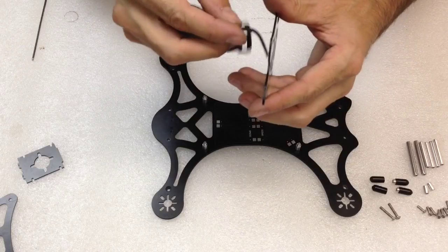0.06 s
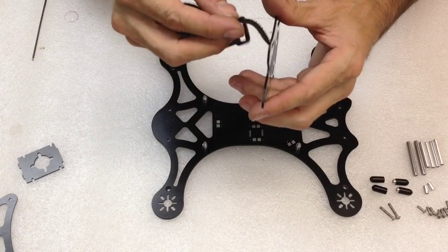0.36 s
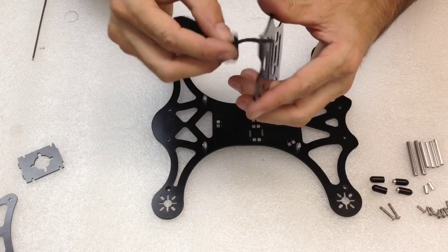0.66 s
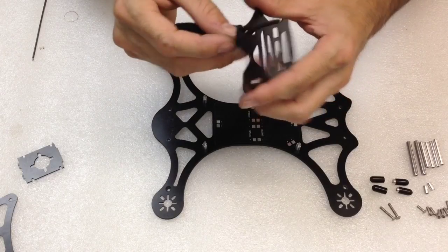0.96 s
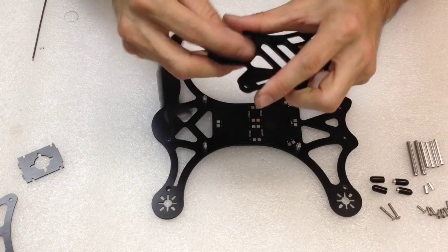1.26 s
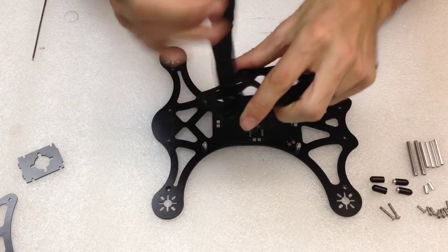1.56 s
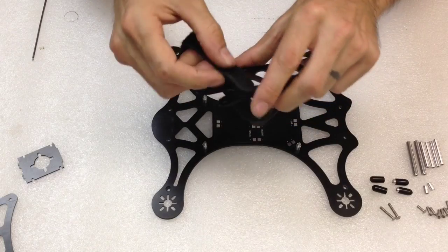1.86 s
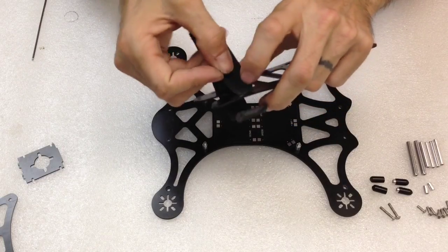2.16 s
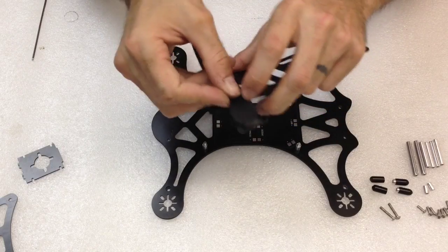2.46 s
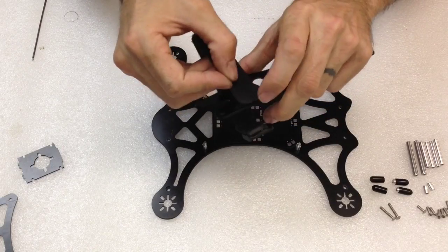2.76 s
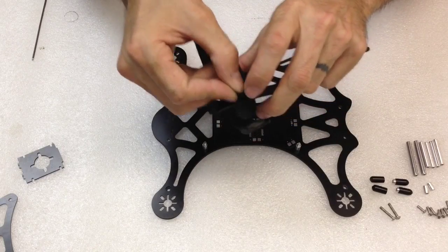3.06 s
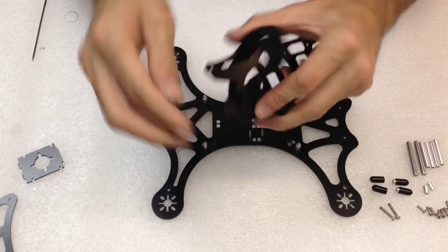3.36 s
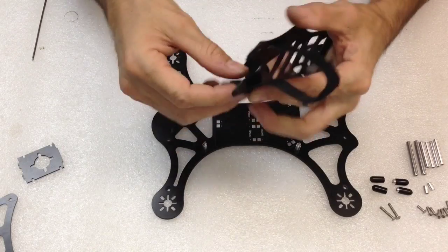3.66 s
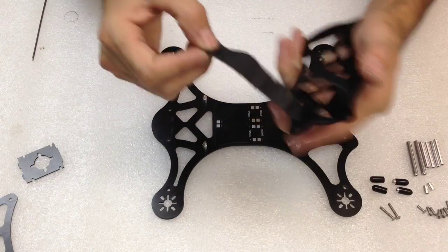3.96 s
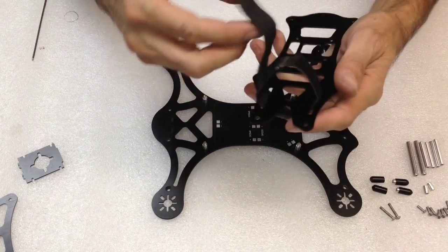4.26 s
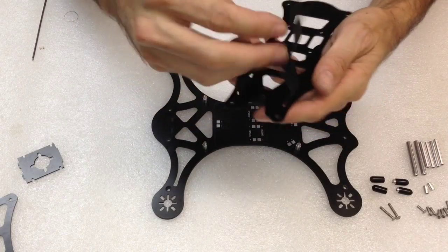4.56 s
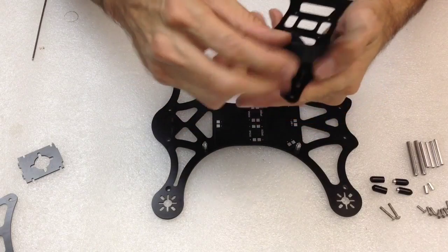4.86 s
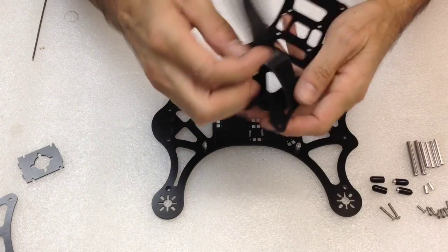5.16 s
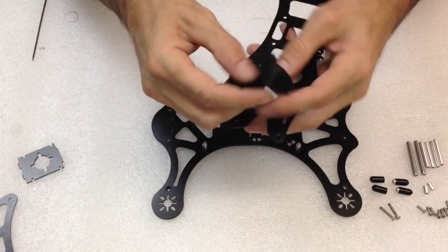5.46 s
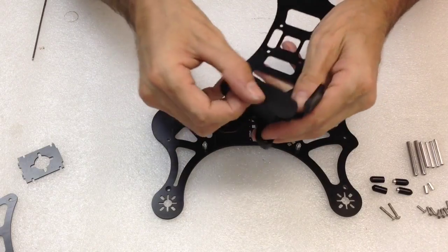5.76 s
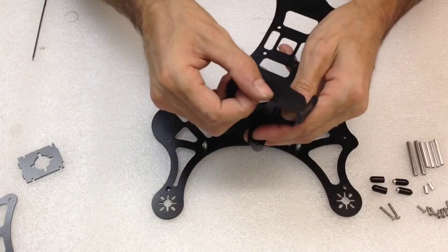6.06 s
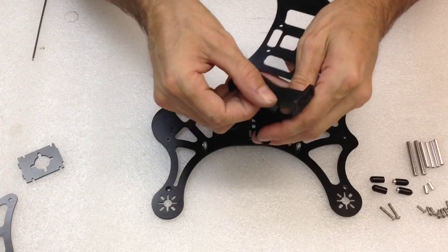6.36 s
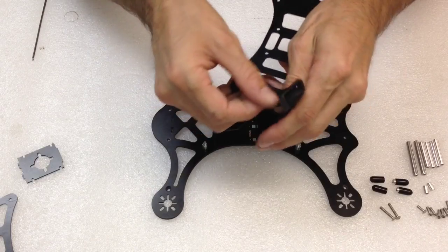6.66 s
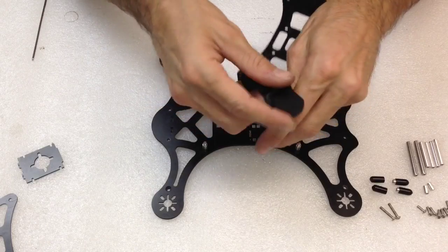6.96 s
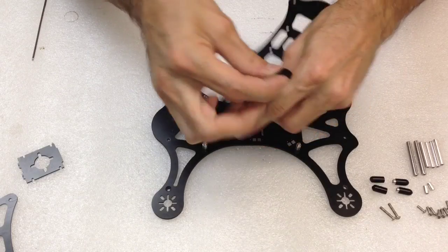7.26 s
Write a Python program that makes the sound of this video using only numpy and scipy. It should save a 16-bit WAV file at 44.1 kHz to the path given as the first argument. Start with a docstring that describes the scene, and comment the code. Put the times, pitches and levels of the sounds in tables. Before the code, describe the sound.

In a small room with a faint fan and low hum, a fabric strap is worked through a slotted plate over a workbench. Soft, close scraping and rustling comes and goes, dotted with small sharp clicks. The strap rasps through a slot early on, again around the middle, and more lightly at the finish, each pull briefly ringing the hand-held plate.

```python
"""Threading a strap through a plate

Hands feed a woven strap through the slots of a thin, stiff plate, close up over a workbench.
The fabric rustles, fibres snag and tick on the slot edges, and fingertips swish over the weave.
In three quick pulls the strap rasps through and rings the plate.
Underneath lies a small room with mains hum and a running fan."""
import sys
import numpy as np
from scipy import signal
from scipy.fft import rfft, irfft, next_fast_len
from scipy.io import wavfile
from scipy.ndimage import uniform_filter1d, map_coordinates

SR = 44100
rng = np.random.default_rng(int(sys.argv[2]) if len(sys.argv) > 2 else 0)


def transcribe(u):
    """Save the signal u as a 16-bit wav file named by the first command-line argument.

    u: samples, shape (n,) or (channels, n), limited to [-1, 1]; the rate is SR.
    q: integer samples, one column per channel.
    """
    v = np.clip(np.atleast_2d(u).T, -1, 1)
    q = np.round(v * 32767).astype(np.int16)
    wavfile.write(sys.argv[1], SR, q)


N = 327354

# Levels in the tables are relative: each layer is trimmed in the mix.
# spectrum of the fan's rumble and hiss: f/Hz, level/dB
FAN_SPECTRUM = [(20, -25), (35, -17.5), (52, -3), (75, -2.5), (115, -0.5), (165, -4.5), (280, -17.5),
                (400, -19), (620, -27), (1100, -30), (2000, -34), (2350, -29.5), (2800, -33), (3750, -28.5),
                (4500, -36.5), (7000, -44), (15300, -49)]
# mains hum and fan tones: f/Hz, level/dB
HUM_TONES = [(59.2, -58), (120, -70), (242, -78), (737.5, -90), (823.6, -76.5)]
# strap resting against the moving fingers: t/s, level/dB
RESTING_CONTACT = [(0, -84.5), (0.6, -70.5), (1.3, -68), (2.6, -67.5), (2.85, -70.5), (3.5, -73.5),
                   (4.2, -63.5), (4.48, -75.5), (4.7, -65.5), (5.85, -66.5), (6.1, -74.5), (7.42, -69.5)]
# finger strokes feeding the strap along: t/s, length/s, level/dB, hollow re stroke/dB
FEED_STROKES = [(0.663, .06, -63, -14), (0.923, 0.051, -48, -19.5), (1.088, 0.069, -59, -22),
                (1.3, 0.07, -59, -23), (1.433, .1, -63.5, -22), (1.654, 0.053, -58, -25),
                (1.765, .13, -75, -18), (2.15, 0.28, -64.5, -11), (2.382, 0.07, -57, -9),
                (2.457, 0.16, -60, -6), (2.622, 0.082, -55, -13.5), (3.02, 0.047, -48.5, -18),
                (3.135, 0.073, -45, -26), (3.212, 0.055, -50, -25), (3.26, 0.047, -45, -16.5),
                (3.634, 0.039, -55.5, -21), (3.794, 0.088, -59.5, -30), (4.112, 0.16, -63, -27),
                (4.196, 0.034, -58, -23), (4.599, .06, -52.5, -20), (4.683, 0.24, -63, -26),
                (4.916, 0.1, -56, -17), (5.133, 0.18, -54.5, -14), (5.375, 0.16, -61, -18),
                (5.56, 0.046, -51.5, -15), (5.624, 0.074, -59.5, -15), (5.745, 0.093, -62.5, -17),
                (6.327, 0.23, -68.5, -22), (6.696, 0.15, -54, -17), (6.863, .11, -48, -14.5),
                (6.998, 0.18, -60, -20), (7.116, 0.18, -54.5, -23)]
# spectrum of loosely sliding fabric: f/Hz, level/dB
RUSTLE_SPECTRUM = [(200, -25.5), (800, -9), (1500, -6.5), (2900, -6.5), (3700, -0.5), (4600, -5),
                   (6000, -3), (7500, -2), (9500, -4), (12000, -5.5), (15300, -9)]
# hollow of the cupped hands, before grip and damping: f/Hz, width/Hz, level/dB
HAND_MODES = [(340, 144, -6.5), (800, 160, 1.5), (1020, 410, -6)]
# fibres snagging and letting go: t/s, level/dB, f/Hz, t60/s, plate/dB
SNAGS = [(0.373, -50.5, 1780, 0.0089, -44.5), (0.5533, -53.5, 8650, 0.016, -56.5),
         (0.685, -33.5, 6000, 0.052, -46), (0.904, -39.5, 9300, 0.011, -51),
         (0.93, -32.5, 14700, 0.025, -55), (0.989, -39.5, 7200, 0.019, -48),
         (1.0631, -37.5, 9100, 0.0082, -67), (1.0874, -32.5, 9000, 0.029, -52),
         (1.0933, -29.5, 8700, 0.022, -62), (1.201, -37, 12100, .006, -64), (1.2642, -40, 6140, 0.012, -67),
         (1.27, -36.5, 13300, 0.047, -64), (1.306, -48, 5900, 0.006, -50.5),
         (1.434, -43, 8800, 0.0045, -73.5), (1.4727, -39.5, 10200, 0.0031, -62),
         (1.5, -38.5, 7700, 0.0054, -65), (1.5057, -40.5, 6200, 0.024, -50.5),
         (1.671, -25, 10500, 0.0074, -58), (1.7967, -45, 5600, .005, -64), (1.863, -50.5, 5900, .005, -71),
         (1.898, -51, 5800, 0.0069, -73), (2.4292, -54, 6760, 0.0049, -49),
         (2.4862, -41, 6550, 0.0046, -55), (2.5398, -42.5, 6400, 0.0035, -61),
         (2.5655, -37, 9400, 0.023, -60), (2.6297, -40.5, 7740, .018, -51),
         (2.8823, -37.5, 9500, 0.027, -46), (3.023, -42, 2230, 0.0089, -49), (3.032, -41, 7200, .017, -50),
         (3.203, -35.5, 7700, 0.0087, -70), (3.344, -43.5, 3970, .012, -63), (3.4593, -54, 6700, .006, -69),
         (3.7725, -37.5, 6240, 0.011, -63), (3.78, -37, 6300, .014, -56.5),
         (3.7861, -31, 13600, 0.013, -50), (3.874, -41.5, 6200, .017, -65), (3.912, -32, 9900, 0.0046, -64),
         (3.9218, -32, 6400, 0.003, -75), (4.0599, -35.5, 3800, .025, -43), (4.532, -44, 8400, 0.023, -54),
         (4.646, -42.5, 6000, .025, -52), (5.007, -33.5, 5470, .014, -59), (5.437, -51, 6500, 0.034, -52),
         (5.5974, -41.5, 6900, .025, -43), (5.858, -47, 10200, .008, -68), (5.871, -48, 7400, 0.0087, -60),
         (6.2025, -48, 7000, 0.0087, -50), (6.5044, -48.5, 13300, 0.0089, -63),
         (6.5837, -52.5, 3200, 0.0039, -45), (6.671, -40, 5940, 0.056, -42),
         (6.7423, -26, 7300, 0.014, -41), (6.897, -36, 5960, 0.0044, -47),
         (7.0093, -42, 7700, 0.004, -48.5), (7.0803, -36, 3680, .006, -70),
         (7.139, -35.5, 9900, 0.068, -68)]
# spectrum of a fibre snapping free: f/Hz, level/dB
SNAP_SPECTRUM = [(300, -11), (1500, -13), (3500, 0), (7000, 2.5), (11000, 0.5), (15300, -2)]
# modes of the hand-held plate, before grip and extra damping: f/Hz, width/Hz, level/dB
PLATE_MODES = [(1140, 207, -9), (1547, 125, 2.5), (1714, 115, 4), (2280, 440, -4), (2900, 320, -0.5),
               (3750, 620, -3)]
# fingertips and strap end skidding: middle t/s, half length/s, f/Hz, level/dB
SKIDS = [(1.128, 0.063, 8100, -61), (2.357, 0.14, 7250, -61), (2.687, 0.13, 8400, -66),
         (3.07, 0.062, 7000, -64), (3.147, 0.014, 910, -48.5), (4.628, 0.02, 4970, -54),
         (4.935, 0.029, 5100, -54), (5.006, 0.03, 5550, -48), (5.396, 0.031, 11000, -56),
         (6.403, 0.2, 8000, -69.5), (7.225, 0.022, 940, -55)]
# tugs that make up the pulls: t/s, rise/s, hold/s, length/s, rasp/dB, plate/dB, hollow/dB, lag/s
TUGS = [(1.512, 0.032, 0.0047, 0.11, -24.5, -32.5, -38.5, 0.0034),
        (1.625, 0.014, 0.0027, 0.043, -39, -44.5, -54, .002),
        (3.9427, .002, 0.021, 0.13, -23.5, -31.5, -40.5, .04),
        (4.098, 0.013, .002, 0.015, -41.5, -41.5, -60, 0.0024),
        (7.285, 0.023, 0.036, 0.077, -36.5, -44.5, -48, .003)]
# spectrum of taut weave on a slot edge: f/Hz, level/dB
RASP_SPECTRUM = [(200, -41), (1200, -27.5), (2500, -8.5), (4000, -0.5), (5000, -2), (6300, 4), (7800, 2),
                 (10000, 2.5), (12500, -2), (15300, -2.5)]
# decay of the room: f/Hz, t60/s
ROOM_DECAY = [(200, 0.31), (2000, 0.14), (8000, 0.2), (15000, 0.2)]

STROKE_ATTACK_S, STROKE_SAG_DB_PER_S, STROKE_RELEASE_S = 0.014, 14, 0.021
CONTACT_HOLLOW_DB = -14  # how much resting contact stirs the hollow of the hands
TUG_ATTACK_S, TUG_RELEASE_S = 0.0022, 0.0062
JERK_S, JERK_DB = 0.0228, 3.5  # the weave grips and slips: period, swing about the mean


def amp(db):
    """Gain of a level in dB."""
    return 10 ** (np.asarray(db) / 20)


def unit(x):
    """x at rms 1."""
    return x / np.sqrt(np.mean(x ** 2) + 1e-20)


def along(points, hz):
    """Read a curve of (f/Hz, value) points on a log frequency axis."""
    f, values = np.transpose(points)
    return np.interp(np.log(hz + 1), np.log(f + 1), values)


def wobble(rate):
    """A smooth random curve with rate knots a second."""
    knots = rng.standard_normal(int(N * rate / SR) + 4)
    return map_coordinates(knots, [np.arange(N) * rate / SR])


def add(track, s, sound):
    """Mix a sound into the track at s seconds."""
    part = track[round(s * SR):][:len(sound)]
    part += sound[:len(part)]


def coloured(x, gain):
    """Minimum-phase EQ with the curve gain(f); white noise keeps its power."""
    size = 2 * next_fast_len(len(x) // 2 + 2048)
    curve = unit(gain(np.fft.rfftfreq(size, 1 / SR)))
    cepstrum = irfft(np.log(np.maximum(curve, 1e-6)))
    cepstrum[1:size // 2] *= 2
    cepstrum[size // 2 + 1:] = 0
    return irfft(rfft(x, size) * np.exp(rfft(cepstrum)), size)[:len(x)]


def resonance(f, hz, width):
    """Complex response of one mode."""
    return 1j * f * width / (hz * hz - f * f + 1j * f * width)


def ring(force, modes, grip=1, damping=1):
    """A body answers a force with all its modes; the fingers' grip shifts and damps them."""
    def response(f):
        return abs(sum((-1) ** k * amp(db) * resonance(f, hz * grip, width * damping)
                       for k, (hz, width, db) in enumerate(modes)))
    return coloured(force, response)


def fan_and_hum(air_db, drift_rad):
    """The bed: fan rumble and hiss under slightly unsteady mains and fan tones."""
    t = np.arange(N) / SR
    air = unit(coloured(rng.standard_normal(N), lambda f: amp(along(FAN_SPECTRUM, f))))
    tones = np.zeros(N)
    for hz, db in HUM_TONES:
        peak = np.sqrt(2) * amp(db + 0.74 * wobble(5.2))
        tones += peak * np.sin(2 * np.pi * hz * t + drift_rad * wobble(2.4))
    return amp(air_db) * air + tones


def stroke_envelopes():
    """Envelopes of the sliding and of the hollow it stirs: each stroke takes hold, sags and lets go."""
    t = np.arange(N) / SR
    slide_power = amp(np.interp(t, *np.transpose(RESTING_CONTACT))) ** 2
    hollow_power = slide_power * amp(CONTACT_HOLLOW_DB) ** 2
    age = t[:SR // 2]
    for s, length, db, hollow_db in FEED_STROKES:
        attack = np.minimum(age / STROKE_ATTACK_S, 1)
        release = np.exp(-np.maximum(age - length, 0) / STROKE_RELEASE_S)
        power = (attack * release * amp(db - STROKE_SAG_DB_PER_S * age)) ** 2
        add(slide_power, s, power)
        add(hollow_power, s, power * amp(hollow_db) ** 2)
    return np.sqrt(slide_power), np.sqrt(hollow_power)


def friction(rate, spread_db, hiss_db, clump_rate, clump_db):
    """Friction grain: fibres let go at random, rate a second, in clumps, over a smooth hiss."""
    plucks = (rng.random(N) < rate / SR) * rng.choice([-1, 1], N)
    sizes = amp(spread_db * np.clip(rng.standard_normal(N), -2, 2))
    grain = unit(plucks * sizes) + amp(hiss_db) * rng.standard_normal(N)
    return unit(grain * amp(clump_db * wobble(clump_rate)))


def shifting_contact(x, depth_db):
    """The contact keeps moving, so its colour drifts in patches."""
    spectra = signal.stft(x, nperseg=512)[2]
    patches = rng.standard_normal(spectra.shape)
    for axis, span in enumerate((7, 26)):  # bins, frames
        patches = uniform_filter1d(uniform_filter1d(patches, span, axis), span, axis)
    return unit(signal.istft(spectra * amp(depth_db * unit(patches)), nperseg=512)[1][:N])


def thread_catches(rate, spread_db, decay_s=0.0012):
    """Now and then a thread catches and frees a tiny burst."""
    starts = (rng.random(N) < rate / SR) * amp(spread_db * (2 * rng.random(N) - 1))
    envelope = signal.lfilter([1], [1, -np.exp(-1 / (decay_s * SR))], starts)
    return unit(envelope * rng.standard_normal(N))


def fabric_rustle(slide_db, catch_db):
    """Loose sliding: a light touch hisses, a firm one crackles, and both stir the hollow of the hands."""
    sliding, stirring = stroke_envelopes()
    touch_db = 20 * np.log10(sliding)
    firmness = np.clip((touch_db + 71.5) / 26, 0, 1)
    hiss = friction(rate=5000, spread_db=2, hiss_db=-4.5, clump_rate=66, clump_db=5)
    crackle = friction(rate=1200, spread_db=4, hiss_db=-3, clump_rate=110, clump_db=2.5)
    texture = np.sqrt(1 - firmness) * hiss + np.sqrt(firmness) * crackle
    slide = amp(touch_db + slide_db) * shifting_contact(texture, depth_db=2)
    # threads catch as soon as the strap moves, and follow the pressure only half as much
    moving = np.clip((touch_db + 75) / 6, 0, 1)
    force = slide + moving * amp(touch_db / 2 + catch_db) * thread_catches(rate=26, spread_db=3.5)
    cupping = amp(4 * wobble(35))
    hollow = ring(force * stirring / sliding * cupping, HAND_MODES, grip=1.17, damping=2.9)
    return coloured(force, lambda f: amp(along(RUSTLE_SPECTRUM, f))) + hollow


def fibre_ticks(snap_db, plate_db, q, attack_s=0.0006, creep_s=0.008, scuff_t60=0.055):
    """A snag creeps, lets go in a burst that rings at its own pitch, and flicks the gripped plate."""
    out = np.zeros(N)
    t = np.arange(SR // 12) / SR - creep_s
    after = np.maximum(t, 0)
    for s, db, hz, t60, body_db in SNAGS:
        snap = amp(-60 * after / t60) * np.exp(np.minimum(t, 0) / attack_s)
        scuff = amp(-27 - 60 * after / scuff_t60) * np.minimum(1 + t / creep_s, 1)
        burst = unit(rng.standard_normal(len(t)) * (snap + scuff))
        # one pitched peak over a broadband floor
        colour = lambda f: amp(along(SNAP_SPECTRUM, f)) * (amp(-11.5) + abs(resonance(f, hz, hz / q)))
        tick = amp(db + snap_db) * unit(coloured(burst, colour))
        grip = rng.uniform(0.85, 1.33)
        plate = unit(ring(burst, PLATE_MODES, grip, damping=2.75))
        hollow = amp(-8) * unit(ring(burst, HAND_MODES, grip, damping=0.63))
        add(out, s + attack_s - creep_s, tick + amp(body_db + plate_db) * (plate + hollow))
    return out


def finger_swishes(trim_db, q):
    """Skin skids over the weave: a narrow band of noise that swells and fades."""
    out = np.zeros(N)
    for s, half_length, hz, db in SKIDS:
        swell = np.hanning(int(2 * half_length * SR))
        width_hz = max(hz / q, 250)
        band = coloured(rng.standard_normal(len(swell)), lambda f: abs(resonance(f, hz, width_hz)) ** 2)
        add(out, s - half_length, amp(db + trim_db) * swell * unit(band))
    return out


def tug_power(db, rise, hold, length, swell_db, fade_db_per_s):
    """Power of one tug: it swells, holds and fades in jerks, then stops as the strap grips."""
    t = np.arange(SR // 4) / SR
    contour_db = -swell_db * np.maximum(1 - t / rise, 0) - fade_db_per_s * np.maximum(t - rise - hold, 0)
    jerks_db = JERK_DB * np.cos(2 * np.pi * (t - rise) / JERK_S)
    gate = (1 - np.exp(-t / TUG_ATTACK_S)) * np.exp(-np.maximum(t - length, 0) / TUG_RELEASE_S)
    return amp(db + contour_db + jerks_db) ** 2 * gate


def strap_pulls(rasp_db, plate_db, hands_db):
    """Taut weave drags over a slot edge in short slips: the rasp leads, plate and hands build after it."""
    def drag(power):
        grain = friction(rate=3500, spread_db=2, hiss_db=-3, clump_rate=400, clump_db=2.5)
        return np.sqrt(power) * grain

    rasp_power, plate_power, hollow_power = np.zeros((3, N))
    for s, rise, hold, length, db, body_db, hollow_db, lag in TUGS:
        lagging = (rise + lag, hold, length)
        add(rasp_power, s, tug_power(db + rasp_db, rise, hold, length, swell_db=9, fade_db_per_s=211))
        add(plate_power, s, tug_power(body_db + plate_db, *lagging, swell_db=9, fade_db_per_s=245))
        add(hollow_power, s, tug_power(hollow_db + hands_db, *lagging, swell_db=13.5, fade_db_per_s=200))
    hollow = ring(drag(hollow_power), HAND_MODES, grip=1.015, damping=1.9)
    rasp = coloured(drag(rasp_power), lambda f: amp(along(RASP_SPECTRUM, f)))
    plate = ring(drag(plate_power), PLATE_MODES)
    return rasp + plate + hollow


def bench_reflections(x, taps=8, decay_s=0.0074):
    """Early reflections off the hands and the bench top, changing as the hands move."""
    out, hop = np.zeros(N), SR // 6
    crossfade = np.sqrt(np.hanning(2 * hop))
    for start in range(0, N, hop):
        piece = x[start:start + 2 * hop]
        echo = np.zeros(SR // 20)
        delays_s = rng.uniform(0.0008, 0.012, taps)
        echo[(delays_s * SR).astype(int)] = rng.choice([-1, 1], taps) * np.exp(-delays_s / decay_s)
        echo /= np.linalg.norm(echo)
        add(out, start / SR, signal.fftconvolve(piece * crossfade[:len(piece)], echo))
    return out


def room_tail(x):
    """The small room's diffuse tail, which dies sooner in the treble than in the bass."""
    hz, t, spectra = signal.stft(rng.standard_normal(SR // 2), SR, nperseg=256)
    decay = amp(-60 * t / along(ROOM_DECAY, hz)[:, None])
    tail = signal.istft(spectra * decay, SR, nperseg=256)[1]
    predelayed = np.pad(tail, (SR // 250, 0))
    return signal.fftconvolve(x, predelayed / np.linalg.norm(tail))[:N]


def scene():
    """Mono mix: the close strap, a touch of bench and room, and the bed of fan and hum."""
    strap = fabric_rustle(slide_db=0.8, catch_db=-35.5)
    strap += finger_swishes(trim_db=-3.5, q=7.1)
    strap += strap_pulls(rasp_db=-1.46, plate_db=-6, hands_db=-7)
    strap += fibre_ticks(snap_db=-14, plate_db=-15, q=7.9)
    space = amp(-11) * bench_reflections(strap) + amp(-17.5) * room_tail(strap)
    return (strap + space + fan_and_hum(air_db=-53.5, drift_rad=0.32))[None]


def record(dry):
    """A steep high cut takes the very top off the mix."""
    top_hz, taper_hz = 15600, 450
    size = next_fast_len(N + SR // 2)
    edge = np.clip((top_hz - np.fft.rfftfreq(size, 1 / SR)) / taper_hz, 0, 1)
    return irfft(rfft(dry, size) * np.sin(edge * np.pi / 2) ** 2, size)[:, :N]


dry = scene()
out = record(dry)
transcribe(out)
```